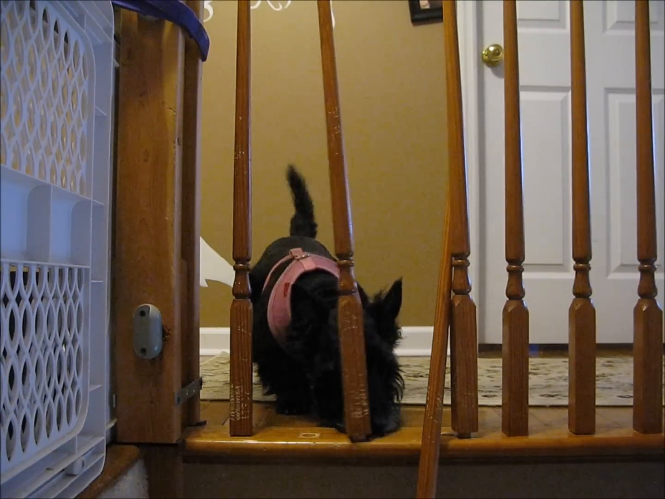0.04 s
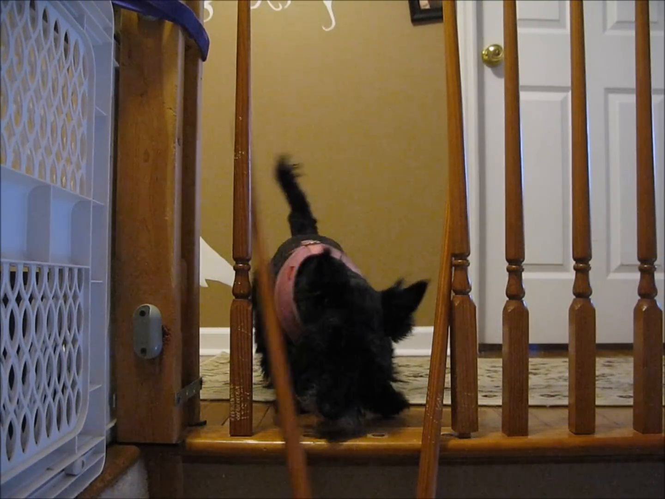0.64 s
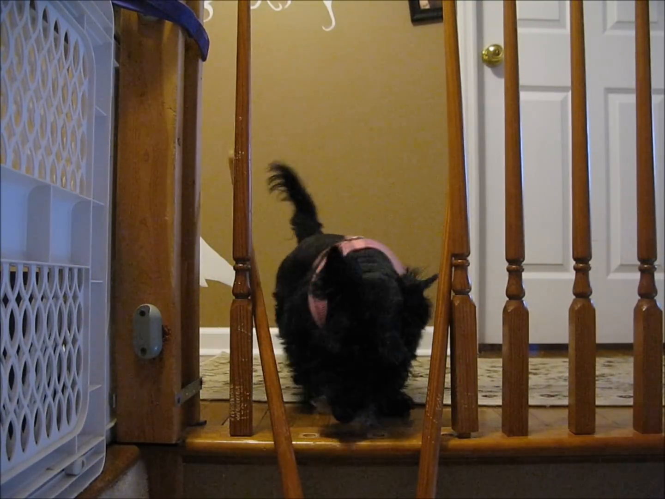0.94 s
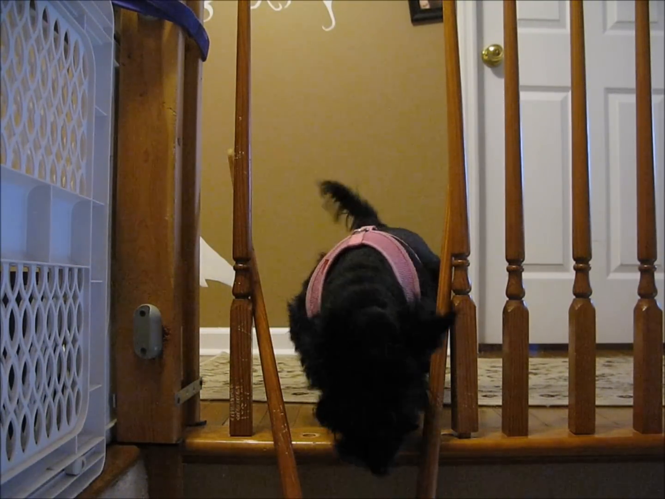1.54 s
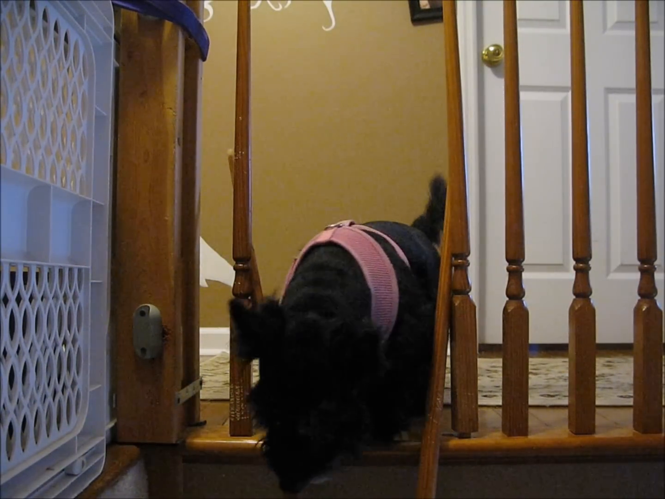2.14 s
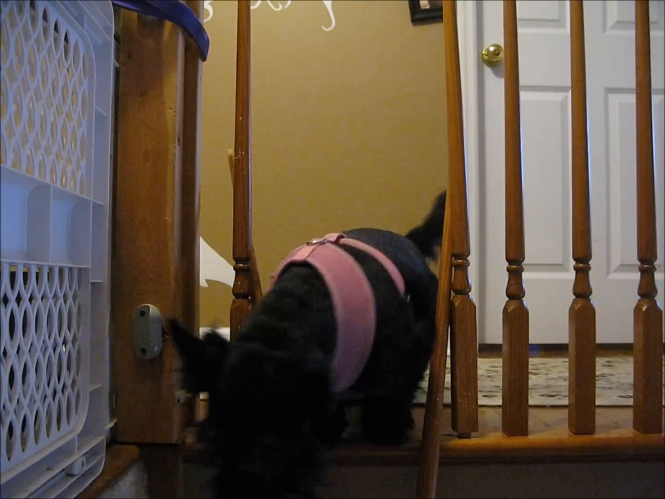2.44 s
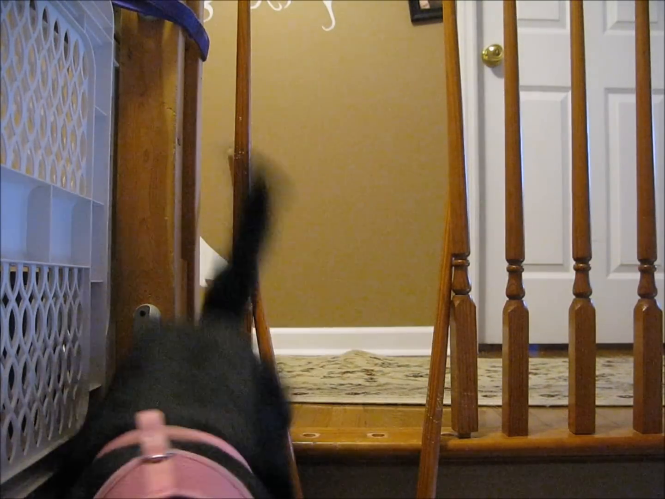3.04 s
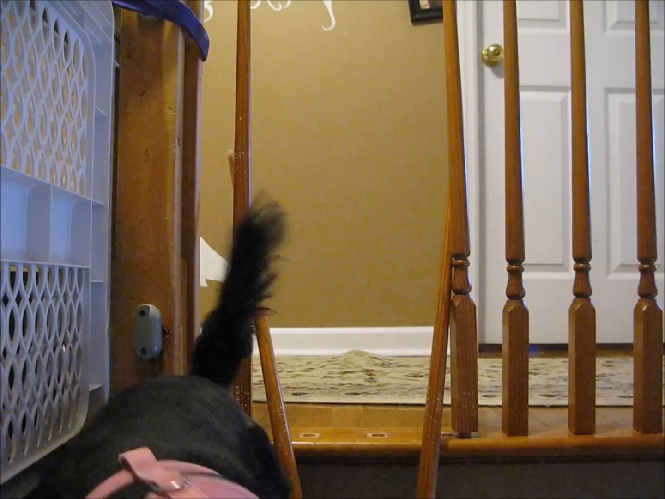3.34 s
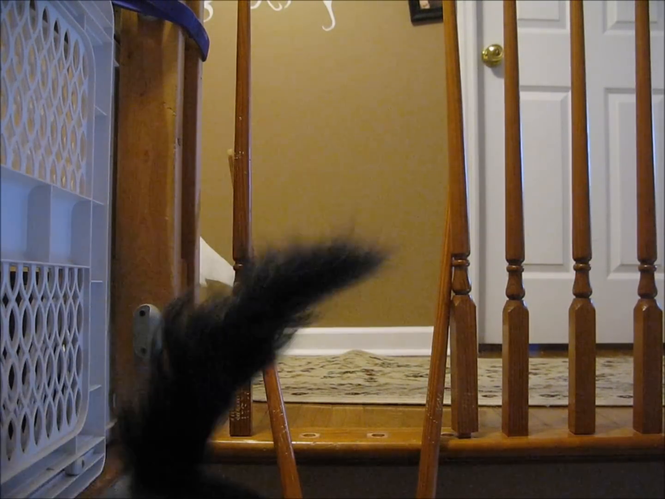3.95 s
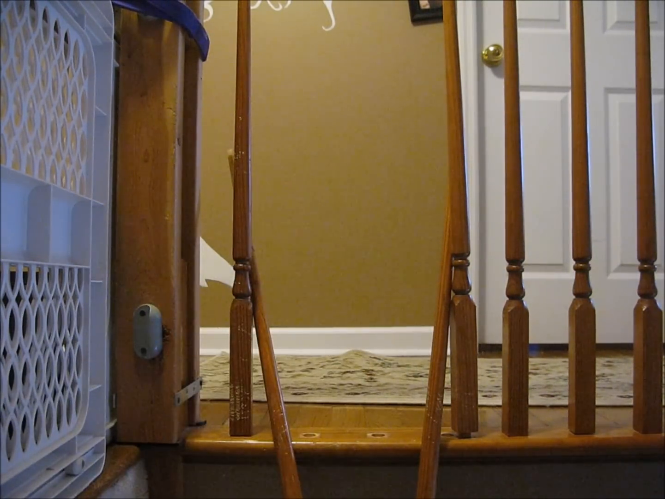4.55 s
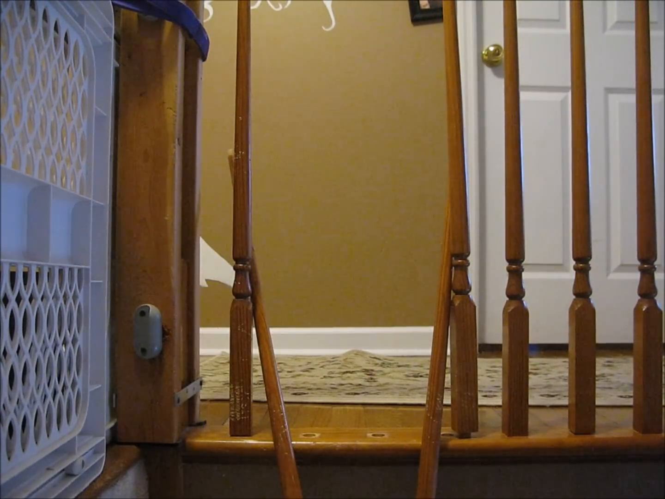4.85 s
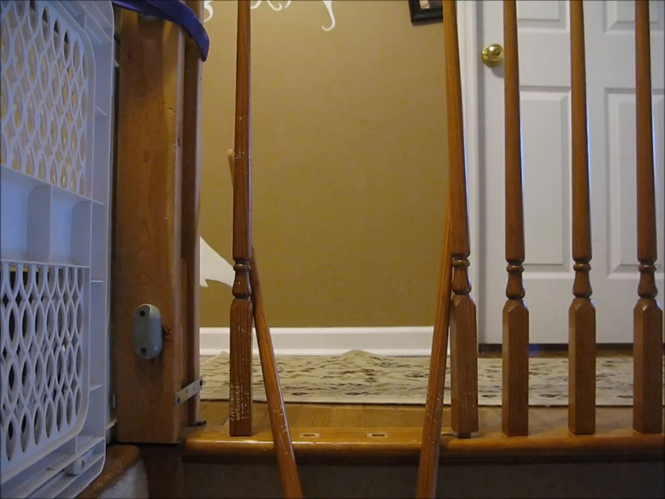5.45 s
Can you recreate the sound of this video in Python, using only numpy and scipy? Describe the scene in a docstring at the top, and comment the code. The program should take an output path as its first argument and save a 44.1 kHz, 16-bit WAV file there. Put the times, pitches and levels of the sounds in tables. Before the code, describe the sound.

A hollow thud and a bright, ringing wooden clatter in a stairwell, followed by a dog's sparse claw ticks and brushing coat.

```python
"""A scrape, a hollow thud and a bright wooden clatter, then claws ticking down the stairs.
A small dog tugs a loose spindle out of a stair rail: it grinds in its socket, drops on a tread,
then falls against a standing baluster, and both rods ring as it rattles to rest. The dog comes
closer, coat brushing and one pad squeaking, and bumps the woodwork.
A hard-walled stairwell rings over a faint hiss."""
import sys
import numpy as np
from scipy import signal
from scipy.fft import rfft, irfft
from scipy.io import wavfile

SR = 44100
rng = np.random.default_rng(int(sys.argv[2]) if len(sys.argv) > 2 else 0)


def inscribe(sig):
    """Save sig as 16-bit PCM at rate SR to the path in sys.argv[1].

    A 1-D sig is mono; a 2-D sig holds one channel per row.
    Samples are clipped to [-1, 1] before scaling.
    """
    pcm = np.round(np.clip(np.atleast_2d(sig).T, -1, 1) * 32767)
    wavfile.write(sys.argv[1], SR, pcm.astype(np.int16))


N = 251370
TIME = np.arange(N) / SR
TAIL_TIME = TIME[:SR]  # one second for a crack or an echo to die in

# The ring of the loose spindle, the standing baluster and a stair tread.
# Each row: pitch in Hz, relative level in dB, time to fade by 60 dB (t60) in seconds.
SPINDLE_MODES = [(324.2, -2.5, 0.69), (454.4, -14, 0.46), (622, -2.5, 0.71), (739, 2, 0.62), (864, 5, 0.23),
                 (1287, -7.5, 0.2), (1618, 0, 0.22), (1594, -3, 0.51), (2170, -11.5, 0.23), (2815, 2, 0.32),
                 (3460, -2.5, 0.25), (4140, -13, 0.42), (4770, -14, 0.49), (4850, -16, 0.39),
                 (5650, -11, 0.39), (6465, -11, 0.43), (7140, -15, .3), (7500, -18, .35)]
BALUSTER_MODES = [(903, 2.5, 0.7), (1080, 6, 0.48), (1310, -1.5, 0.34), (1390, 0.5, 0.28), (1487, -4, 0.37),
                  (1625, 2, 0.37), (1760, -2.5, 0.27), (2217, 0.5, 0.21), (2350, -8, .36), (2832, -6, .38),
                  (2950, -2, 0.25), (3460, -8, 0.25), (3660, -8.5, 0.54), (3900, -25, 0.51),
                  (4113, -14, .3), (4930, -13, .35)]
TREAD_MODES = [(77.3, 2, 0.44), (116.9, -5, 0.32), (176, -4.5, 0.18), (264.5, 2, 0.31), (315, -18, 0.22),
               (402.4, -5.5, 0.24), (449, -2.5, 0.2), (500, 1, 0.34), (656, -23, 0.23), (838, -12, 0.33)]
# Hard hits, wood on wood. Each row: start in seconds, level in dB, contact cut-off in Hz,
# edge tick level in dB, then the sends to the spindle's and the baluster's ring in dB.
SPINDLE_STRIKES = [(.0730, -43.5, 4430, -62, -6, -23), (.3720, -44, 7000, -44.5, -11, -25),
                   (0.6136, -17, 1720, -28, 3.5, -22), (.7100, -22, 1500, -32.5, -10, -24),
                   (.7330, -13.5, 4700, -23.5, -4, -3), (.7385, -15.5, 4100, -30, -17, -14),
                   (0.748, -28, 7400, -40, -2, .5)]
# The rattle after the hits. Each row: start in seconds, level in dB, send to the baluster's ring in dB.
SPINDLE_REBOUNDS = [(.6235, -21, -16), (.6470, -26, -11), (.7650, -27, 9), (.7810, -24, -3),
                    (.8000, -20.5, -10), (.8125, -23.5, 0), (.8370, -17.5, -10), (.8695, -22.5, 8),
                    (.8845, -21, -5.5), (.8895, -21.5, -10), (.9030, -25.5, -0.5), (.9220, -29.5, -2),
                    (.9700, -26, -14), (1.090, -37, -10)]
# The colour of the rods' crowded, short-lived modes, and of the socket with the spindle wedged in it.
# Each row: centre in Hz, width in Hz, relative level in dB.
CRACK_RESONANCES = [(996, 1860, 3), (2255, 130, 2.5), (2905, 120, 2), (3450, 560, -2), (4110, 260, 1),
                    (4780, 360, 4), (5450, 230, -5), (6430, 860, -6), (7700, 2000, -23), (13600, 6400, -10)]
SOCKET_RESONANCES = [(199, 19, -7), (355, 43, -4.5), (804, 37, 0), (950, 24, -5), (1584, 21, -5),
                     (2120, 52, -15), (3480, 30, -12.5)]
# The spindle's foot drops on the tread; later the dog bumps the woodwork.
# Each row: start in seconds, level in dB, contact cut-off in Hz, send to the tread's ring in dB.
SPINDLE_THUDS = [(.3712, -28, 1090, -8), (.3732, -10, 673, -8.5), (.4110, -23.5, 610, -3),
                 (.4160, -22, 390, 4)]
DOG_BUMPS = [(4.172, -59, 400, -5), (4.2132, -46, 600, -6), (4.3795, -28, 1500, -9.5),
             (4.3945, -34, 1920, -22), (4.4070, -38, 1920, -18), (4.610, -49.5, 500, -20)]
# Paws on the boards. Each row: start in seconds, claw level in dB, claw cut-off in Hz, pad level in dB.
PAW_STEPS = [(1.1040, -34.5, 9000, -40.5), (1.280, -49.5, 3800, -60), (2.2010, -41, 6000, -65),
             (2.4651, -47, 3200, -56), (2.5412, -42, 3820, -63), (2.7880, -46, 4000, -46),
             (2.8170, -29.5, 14100, -46.5), (2.9785, -44.5, 1900, -45.5), (3.1720, -51.5, 3000, -50),
             (3.2190, -49.5, 15000, -70), (4.1386, -44, 7000, -46.5)]
# The claws get drier as the dog comes closer. Each row: time in seconds, echo send in dB.
CLAW_ECHO_SEND = [(2.2, 0.5), (3.2, -3)]
# Coat and harness rubbing. Each row: peak time in seconds, peak level in dB,
# swell and fade time in seconds, centre in Hz.
COAT_SCUFFS = [(2.695, -43.5, 0.03, 2000), (2.832, -23, 0.012, 3800), (2.848, -33.5, 0.034, 1690),
               (3.002, -46, 0.017, 1200), (3.170, -53, 0.067, 5600), (3.745, -44.5, 0.1, 2780),
               (4.260, -54, 0.27, 3000), (4.755, -49, 0.036, 2200)]
# The stairwell's reverb. Each row: frequency in Hz, t60 in seconds, relative echo level in dB.
STAIRWELL_BANDS = [(80, 0.79, -3), (252, 0.44, 6), (564, 0.53, 0), (1170, 0.42, 4), (3000, 0.39, 0.5),
                   (5770, 0.56, -4.5), (9000, 0.32, -3.5), (14000, 0.22, -1)]
# The tone of the steady background. Each row: frequency in Hz, relative spectral level in dB.
HISS_SPECTRUM = [(15, -60), (25, -10), (76, -5), (206, -6.5), (317, -5.5), (476, -8), (677, -5),
                 (754, -6.5), (887, -6.5), (1160, -7.5), (1610, -9), (2760, -11.5), (7920, -18),
                 (14000, -24), (16000, -28)]


def spindle_clatter():
    """Each bounce cracks and rings both rods; hard corners give the brightest blows."""
    cracks, stairs = np.zeros((2, N))
    on_spindle, on_baluster = [], []
    for s, db, low_hz, cut_hz, spindle_db, baluster_db in spindle_contacts():
        crack_t60 = 0.035 * min(900 / low_hz, 1) ** 0.27  # brighter cracks die sooner
        add(cracks, s, undb(db) * crack(bandpass(low_hz, cut_hz), t60=crack_t60, rough=5.3))
        # the staircase takes up a little of each blow
        add(stairs, s, undb(db - 19) * crack(bandpass(66.5, 480), t60=0.046, rough=3.2))
        coupling = bandpass(.5 * low_hz, cut_hz, order=1)
        on_spindle.append((s, db + spindle_db, coupling))
        on_baluster.append((s, db + baluster_db, coupling))
    spindle = wood_ring(SPINDLE_MODES, on_spindle, scatter_db=1, waver=.4)
    baluster = wood_ring(BALUSTER_MODES, on_baluster, scatter_db=1, waver=.4)
    knocks = resonate(cracks, CRACK_RESONANCES) + stairs
    return stairwell(knocks, wet_db=-1.5) + undb(-3) * (spindle + baluster)


def spindle_contacts():
    """Every touch of the spindle: its start, level, low and high corner, and sends to the two rods."""
    for s, db, cut_hz, edge_db, spindle_db, baluster_db in SPINDLE_STRIKES:
        yield s, db, 0.31 * cut_hz, cut_hz, spindle_db, baluster_db
        # the hard edge adds a bright tick that rings the rods only a little
        yield s, edge_db, 5900, 13700, -6.5, -6.5
    for s, db, baluster_db in SPINDLE_REBOUNDS:
        cut_hz, spindle_db = rebound_tone(s)
        yield s, db, 0.24 * cut_hz, cut_hz, spindle_db, baluster_db


def rebound_tone(s, dull_hz=643, dulling_s=0.14, freeing_s=0.15):
    """After a strike the rebounds dull to a plain knock, while the loosening spindle rings more freely."""
    struck_s, _, struck_hz, *_ = [row for row in SPINDLE_STRIKES if row[0] < s][-1]
    since = s - struck_s
    cut_hz = dull_hz + 0.32 * struck_hz * np.exp(-since / dulling_s)
    spindle_db = np.interp(since, [0, freeing_s], [-19, -3.5])
    return cut_hz, spindle_db


def crack(contact, t60, rough):
    """The first push of a contact and the burst of crowded, short-lived modes behind it."""
    push = unit_hit(signal.unit_impulse(len(TAIL_TIME)))
    burst = unit_hit(rng.standard_normal(len(TAIL_TIME)) * undb(-60 * TAIL_TIME / t60))
    return unit_hit(signal.sosfilt(contact, push + rough * burst))


def wood_ring(modes, blows, scatter_db, waver):
    """Each blow tops up the energy of the wood's modes, which then drains away."""
    hz, db, t60 = np.transpose(modes)
    feeds, ringing = np.zeros((len(hz), N)), np.zeros(N)
    for s, blow_db, contact in blows:
        # every striking point shares the energy out a little differently
        gain = undb(db + scatter_db * rng.standard_normal(len(hz)))
        gain *= abs(signal.sosfreqz(contact, hz, fs=SR)[1])
        feeds[:, int(s * SR)] += 2 * undb(blow_db) ** 2 * gain ** 2 / np.sum(gain ** 2)
    knots = np.arange(0, N / SR, .02)
    for mode_hz, mode_t60, feed in zip(hz, t60, feeds):
        retained = np.exp(-2 * np.log(1000) / (mode_t60 * SR))
        energy = signal.lfilter([1], [1, -retained], feed + 1e-20)
        envelope = signal.lfilter([.02], [1, -.98], np.sqrt(energy))  # rounds off the attack
        # tumbling and echoes make each partial waver in level and phase
        swell, drift = (np.interp(TIME, knots, waver * rng.standard_normal(len(knots))) for _ in range(2))
        phase = 2 * np.pi * (mode_hz * TIME + rng.random())
        ringing += envelope * ((1 + swell) * np.sin(phase) + drift * np.cos(phase))
    return ringing


def tread_thuds(hits, low_hz, t60, rough, wet_db, order):
    """Blunt blows: a dull push, then the hollow tread booms; a higher order is a softer contact."""
    pushes, blows = np.zeros(N), []
    low_cut = signal.butter(2, low_hz, "high", fs=SR, output="sos")
    for s, db, cut_hz, ring_db in hits:
        high_cut = signal.butter(order, cut_hz, fs=SR, output="sos")
        contact = np.vstack([low_cut, high_cut])
        add(pushes, s, undb(db) * crack(contact, t60, rough))
        blows.append((s, db + ring_db, contact))
    return stairwell(pushes, wet_db) + wood_ring(TREAD_MODES, blows, scatter_db=1.5, waver=0.27)


def socket_scrape():
    """Slips in the socket grind and shake the wedged spindle."""
    rubbing = signal.sosfilt(bandpass(170, 1240), slips(per_s=700, spread_db=1))
    shaking = signal.sosfilt(bandpass(150, 4500), slips(per_s=640, spread_db=1.5))
    singing = resonate(shaking, SOCKET_RESONANCES)
    grind = unit(unit(rubbing) + undb(7.5) * unit(singing))
    return stairwell(grind * tug(), wet_db=-5)


def tug(start_s=.08, full_s=0.15, release_s=0.18, hold_db=-39, rise_db_per_s=135, fall_db_per_s=176):
    """The pull on the spindle builds, holds while the end drags, then lets go."""
    attack_db = rise_db_per_s * np.maximum(full_s - TIME, 0)
    release_db = fall_db_per_s * np.maximum(TIME - release_s, 0)
    return undb(hold_db - attack_db - release_db) * (TIME > start_s)


def paw_steps(claw_gap_s=.015):
    """Two claws tick on the boards in quick succession, and the pad lands with the first."""
    claws, pads = np.zeros((2, N))
    for s, db, cut_hz, pad_db in PAW_STEPS:
        contact = bandpass(0.19 * cut_hz, cut_hz)
        add(claws, s, undb(db) * crack(contact, t60=0.022, rough=6.4))
        add(claws, s + claw_gap_s, undb(db - 2) * crack(contact, t60=0.022, rough=6.4))
        add(pads, s, undb(pad_db) * crack(bandpass(170, 1120), t60=0.036, rough=1.7))
    send = undb(np.interp(TIME, *np.transpose(CLAW_ECHO_SEND)))
    return (1 - send) * claws + stairwell(send * claws + pads, wet_db=-0.5)


def dog_scuffs():
    """Coat and harness brush along the stairs, and one pad squeaks on the varnish."""
    coat = sum(rub(*scuff, spread=2.76) for scuff in COAT_SCUFFS)
    squeak = rub(peak_s=2.692, db=-39.5, fade_s=0.02, hz=1410, spread=1.1)
    return stairwell(coat + squeak, wet_db=-9.5)


def rub(peak_s, db, fade_s, hz, spread):
    """Fine friction grains swell and fade in a band that reaches a factor of spread either side of hz."""
    grains = signal.sosfilt(bandpass(hz / spread, hz * spread), slips(per_s=6000, spread_db=-2))
    return undb(db) * unit(grains) * np.exp(-abs(TIME - peak_s) / fade_s)


def slips(per_s, spread_db):
    """Tiny stick-slip clicks, random in timing, direction and size."""
    slipping = rng.random(N) < per_s / SR
    direction = rng.choice([-1, 1], N)
    return slipping * direction * undb(spread_db * rng.standard_normal(N))


def stairwell(direct, wet_db, build_s=0.0036):
    """Direct sound plus dense echoes from near walls, weaker and shorter in the top treble."""
    hz = np.fft.rfftfreq(len(TAIL_TIME), 1 / SR)
    centres = np.array(STAIRWELL_BANDS)[:, 0]
    noise, echoes = rfft(rng.standard_normal(len(TAIL_TIME))), 0
    for (_, t60, db), solo in zip(STAIRWELL_BANDS, np.eye(len(centres))):
        crossfade = on_log(hz, np.c_[centres, solo])
        band = irfft(noise * crossfade, len(TAIL_TIME))
        echoes += undb(db - 60 * TAIL_TIME / t60) * band
    echoes *= 1 - np.exp(-TAIL_TIME / build_s)
    return direct + undb(wet_db) * signal.fftconvolve(direct, echoes / np.linalg.norm(echoes))[:N]


def house_hiss(level_db=-50.5):
    """A faint, even bed of house tone and microphone noise."""
    tone = undb(on_log(np.fft.rfftfreq(N, 1 / SR), HISS_SPECTRUM))
    return undb(level_db) * unit(irfft(rfft(rng.standard_normal(N)) * tone, N))


def resonate(x, bands):
    """Colour a sound with parallel resonances, keeping its energy."""
    voiced = sum(undb(db) * signal.lfilter(*signal.iirpeak(hz, hz / width, fs=SR), x)
                 for hz, width, db in bands)
    return voiced * np.linalg.norm(x) / np.linalg.norm(voiced)


def bandpass(low_hz, high_hz, order=2):
    """A filter that passes the band between two corners."""
    high_hz = min(high_hz, .47 * SR)
    return signal.butter(order, [min(low_hz, .9 * high_hz), high_hz], "band", fs=SR, output="sos")


def on_log(hz, points):
    """Read a curve of (Hz, value) points on a log-frequency axis."""
    point_hz, values = np.transpose(points)
    return np.interp(np.log(np.maximum(hz, 1)), np.log(point_hz), values)


def undb(db):
    """Decibels to gain."""
    return 10 ** (np.asarray(db) / 20)


def unit(x):
    """Scale to rms 1."""
    return x / np.sqrt(np.mean(x ** 2))


def unit_hit(x):
    """Scale to the energy of 10 ms at rms 1."""
    return x * np.sqrt(.01 * SR / np.sum(x ** 2))


def add(track, s, sound):
    """Mix a sound into the track at s seconds."""
    start = max(int(s * SR), 0)
    track[start:start + len(sound)] += sound[:N - start]


def scene():
    """Spindle, dog and background in one mono mix."""
    thuds = tread_thuds(SPINDLE_THUDS, low_hz=149, t60=0.053, rough=1.57, wet_db=-7, order=3)
    bumps = tread_thuds(DOG_BUMPS, low_hz=124, t60=0.023, rough=1.9, wet_db=-3.5, order=2)
    spindle = thuds + spindle_clatter() + socket_scrape()
    dog = paw_steps() + dog_scuffs() + bumps
    return (spindle + dog + house_hiss())[None]


def record(dry, top_hz=15900):
    """Peaks over full scale clip, and a steep filter cuts the very top."""
    high_cut = signal.ellip(10, .2, 80, top_hz, fs=SR, output="sos")
    return signal.sosfilt(high_cut, np.clip(dry, -1, 1))


dry = scene()
out = record(dry)
inscribe(out)
```